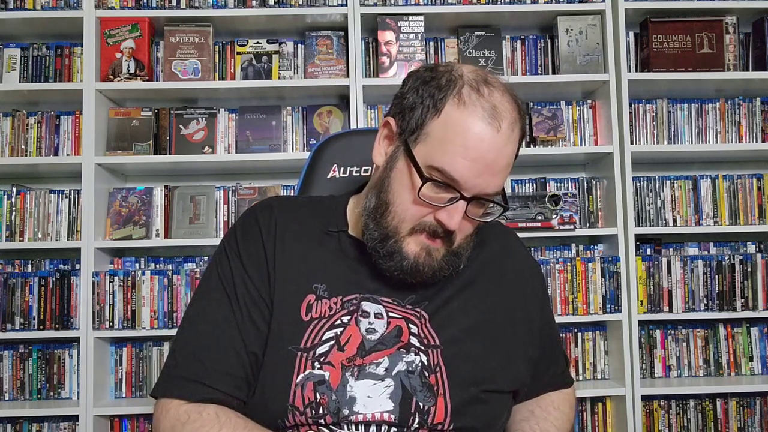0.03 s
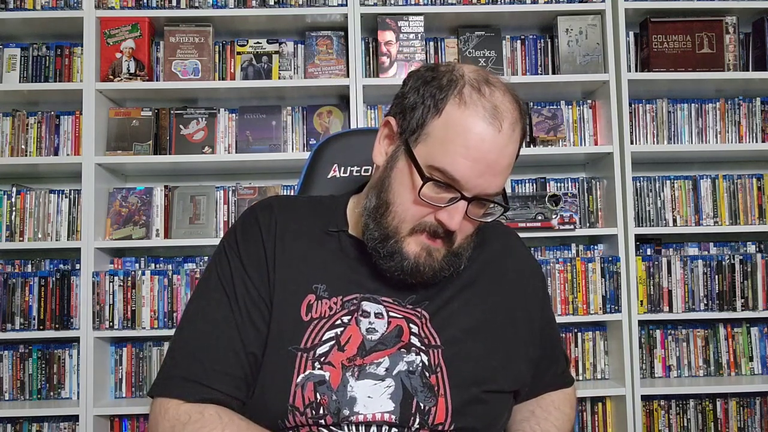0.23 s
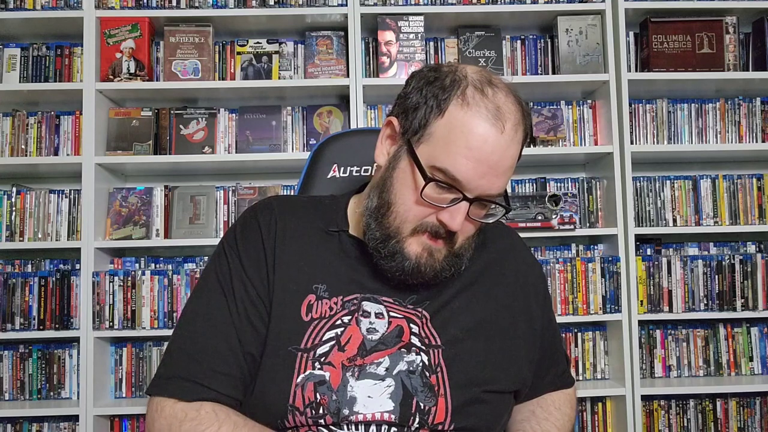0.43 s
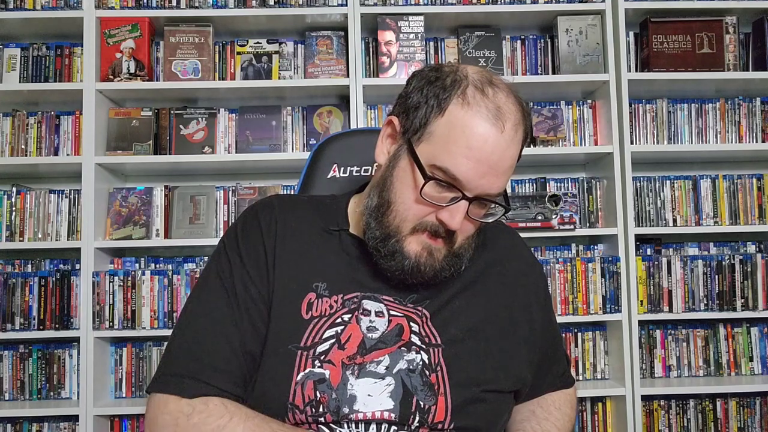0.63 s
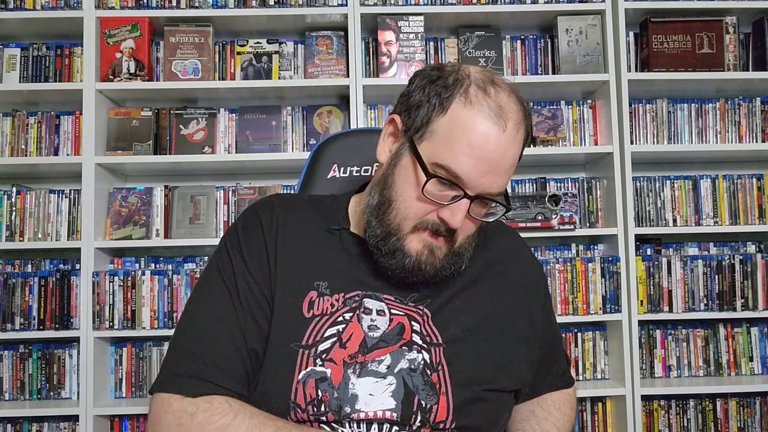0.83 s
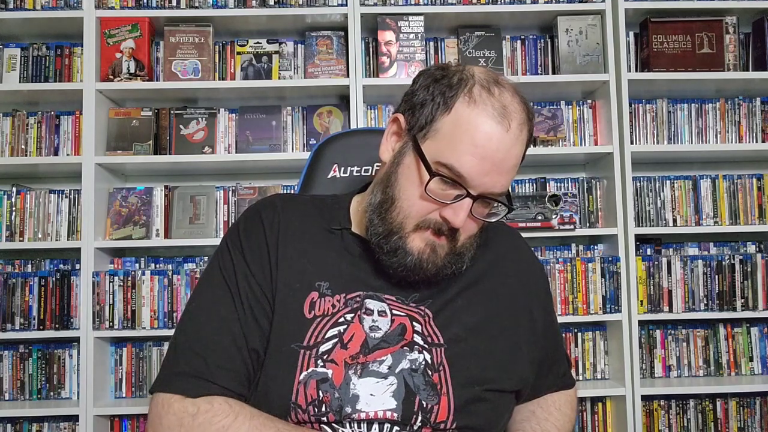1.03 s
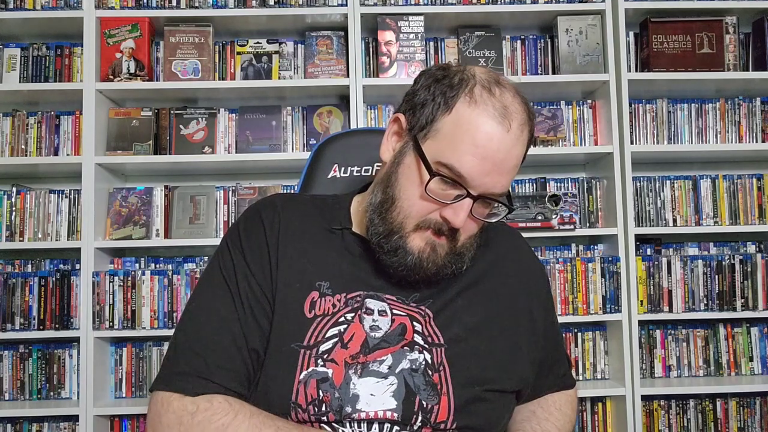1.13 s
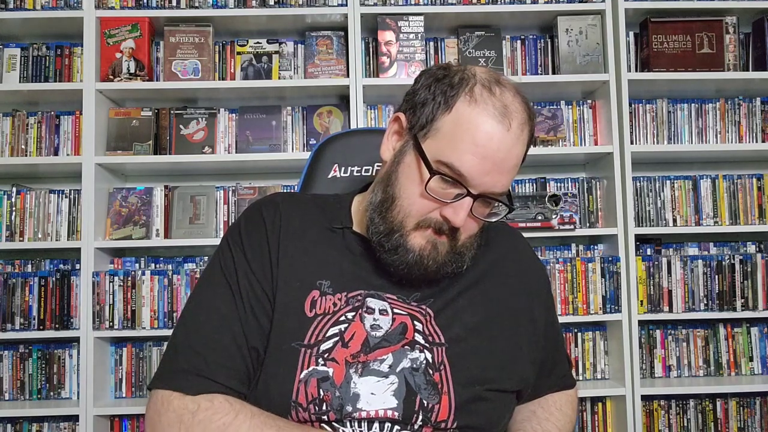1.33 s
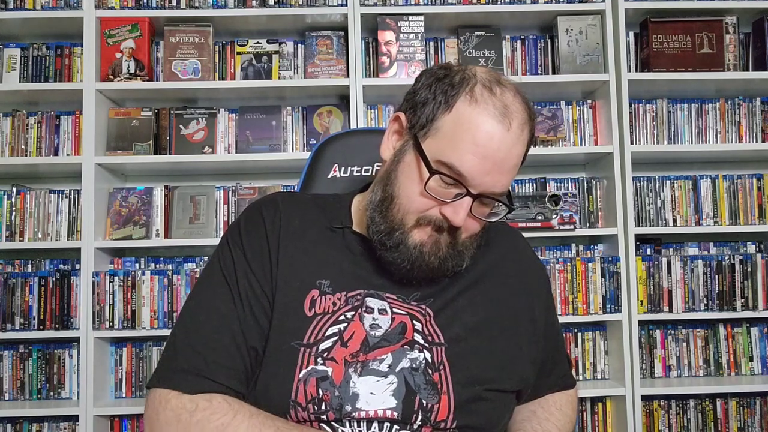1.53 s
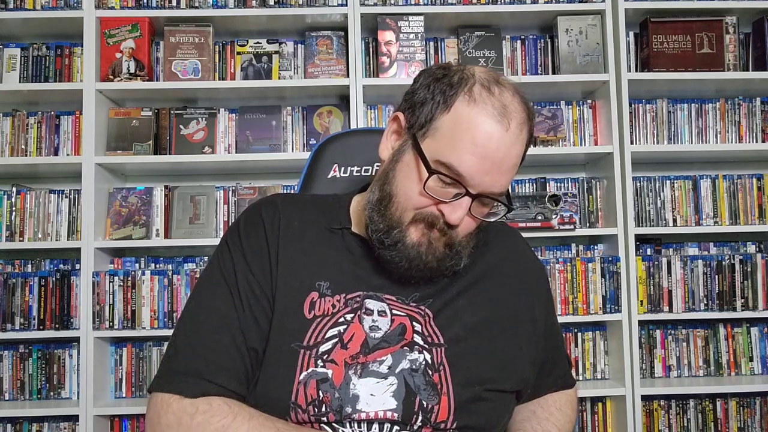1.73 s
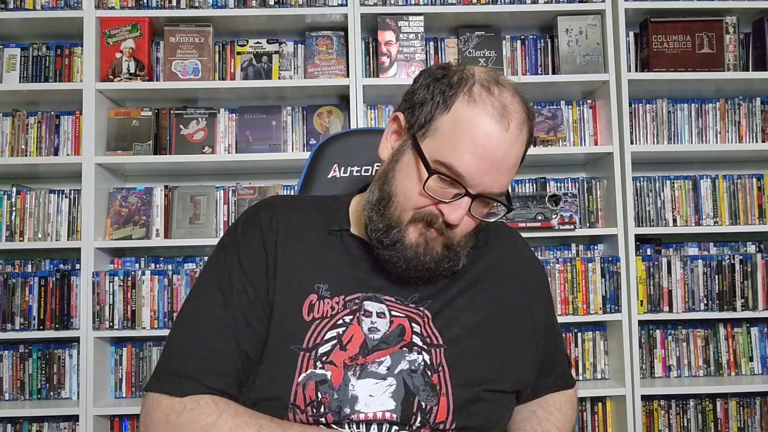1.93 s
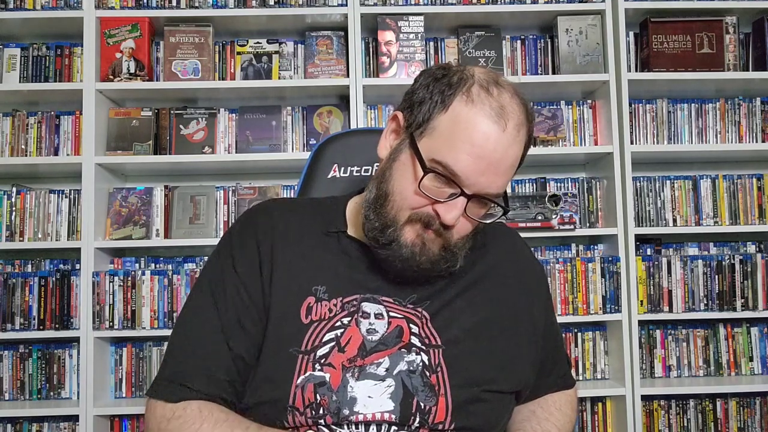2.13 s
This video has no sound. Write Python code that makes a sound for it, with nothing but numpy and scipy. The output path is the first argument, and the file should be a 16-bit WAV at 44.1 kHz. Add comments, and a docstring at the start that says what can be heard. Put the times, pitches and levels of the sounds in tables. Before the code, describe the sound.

A plastic disc case snaps open sharply, then light knocks and ticks in a quiet room

```python
"""Opening a plastic disc case

In a small quiet room a catch clicks, the case's shell snaps open and rebounds, then lid and fingers knock, tick
and rub over a desk. Contacts are decaying noise with damped modes; rubs are grainy noise; a convolved room answers.
Arms rustle from 1.1 s on, over a low hum of sine lines and faint air noise. Sound reaches the left channel first.
"""
import sys
import numpy as np
from scipy import signal
from scipy.fft import rfft, irfft, next_fast_len
from scipy.io import wavfile
from scipy.ndimage import map_coordinates

SR = 44100
rng = np.random.default_rng(int(sys.argv[2]) if len(sys.argv) > 2 else 0)


def dump_mix(stems):
    """Bounce the given channels to the path in sys.argv[1] as a 16-bit WAV at rate SR."""
    frames = np.atleast_2d(stems).T  # one column per channel
    limited = np.clip(frames, -1, 1)  # hard clip at full scale
    pcm = np.round(limited * 32767).astype(np.int16)
    wavfile.write(sys.argv[1], SR, pcm)


N = 97020  # length in samples

# All levels are those before the left-right balance.
# Lines of the hum. Each row: frequency in Hz, mean level in dB rms.
HUM_LINES = [(58.8, -64.5), (87, -62), (118.4, -82.5)]
# Colour of the room's faint noise. Each row: frequency in Hz, relative density in dB per Hz.
AIR_COLOUR = [(20, -19), (40, -15), (60, -7), (90, -8), (150, -24), (500, -27), (1500, -30), (2500, -37),
              (4000, -36), (6000, -42), (7600, -42), (9500, -52), (15500, -51)]
# Likeness of that noise in the two channels. Each row: frequency in Hz, correlation from 0 to 1.
AIR_ALIKE = [(60, 1.0), (500, 0.27), (3000, .5), (10000, 0.11)]
AIR_DB = -68  # rms

# Arms shifting on the desk. Each row: time in seconds, level in dB.
SHIFTING_LEVEL = [(1.1, -91), (1.288, -78), (1.368, -72.5), (2.14, -76), (2.2, -72)]
# Colour of that rustle. Each row: frequency in Hz, relative density in dB per Hz.
SHIFTING_COLOUR = [(100, -15), (230, 0), (500, -2), (1000, -7), (2000, -11), (4000, -24), (9000, -40)]

# Decay of the room's tail. Each row: frequency in Hz, t60 in seconds.
ROOM_DECAY = [(100, 0.44), (500, 0.29), (1500, 0.21), (4000, 0.35), (8000, 0.21), (15000, .26)]
# Likeness of the room's answer in the two channels. Each row: frequency in Hz, correlation from 0 to 1.
ROOM_LIKENESS = [(100, 0.7), (1000, 1), (4000, 0.17), (15000, 0.25)]
# levels of the tail and of the first answers of desk and shelves, and the decay of the latter
TAIL_DB, EARLY_DB, EARLY_T60_S = -13, -10, .1
ROOM_DELAY_S = .006  # before the whole answer

# Small contacts of lid, fingers and desk. Each row: start in seconds, level in dB, bass in dB, treble in dB,
# t60 of the noise in seconds, ring frequency in Hz, ring level in dB.
KNOCK_EVENTS = [(.3675, -45, 6, -20, .014, 1050, -8), (.377, -46, 4, -8, .015, 350, -10),
                (.3925, -36, -2, 1, .018, 400, -18), (.399, -41, 2, 0, .03, 1000, -14),
                (.405, -41, 2, -1, .025, 650, -11), (.4425, -43, 3, -22, .03, 1050, -8),
                (.4485, -43, 1, -24, .025, 690, 0), (.4745, -53, -3, -7, .04, 1700, -10),
                (.635, -59, -8, -1, .02, 1130, -6), (.718, -64, -3, -12, .04, 1700, -12),
                (.781, -47, 2, -4, .02, 1010, -8), (.7895, -54, 4, -6, .03, 420, -6),
                (.802, -57, 4, -5, .03, 430, -6), (.9025, -64, 2, -16, .03, 545, 9),
                (1.0838, -37, -4, 0, .018, 1720, -14), (1.0975, -39, 1, -3, .025, 950, -12),
                (1.103, -36, 0, 0, .016, 250, -13), (1.111, -43, 2, -9, .02, 545, -9),
                (1.227, -60, -1, -8, .035, 2150, -12), (1.278, -61, -1, -5, .035, 2150, -12),
                (1.41, -54, -8, -7, .035, 1060, -5), (1.464, -53, 0, -4, .025, 640, -7),
                (1.49, -58, -1, -5, .035, 1600, -8), (1.527, -52, -6, 0, .025, 2150, -9),
                (1.557, -52, -4, 1, .02, 3290, -7), (1.903, -58, 1, -10, .04, 900, -10),
                (1.915, -59, 1, -9, .03, 450, -12), (1.986, -58, 2, -15, .035, 1850, -11),
                (2.12, -59, -2, -14, .025, 2000, -7)]
# Plastic rubbing under the fingers. Each row: start in seconds, length in seconds, level in dB,
# bass in dB, treble in dB.
RUB_EVENTS = [(.204, 0.044, -36.5, -6, -9), (0.353, 0.039, -59.5, 12.5, -37.5),
              (0.371, 0.068, -48.5, 6.5, -6), (0.427, 0.076, -52.5, -0.5, -53),
              (1.088, 0.037, -42, -1, -26), (1.158, 0.063, -95.5, -8, 20.5), (1.398, 0.039, -68.5, 0, 0),
              (2.128, 0.055, -68.5, -1.5, -12.5)]
# Colour of a light contact. Each row: frequency in Hz, gain in dB.
CONTACT_COLOUR = [(60, -17.5), (150, 0), (260, 8), (500, 14.5), (750, 8), (1020, 14), (1300, 9),
                  (1700, 14.5), (2600, 7), (3300, 10.5), (5500, 10), (7500, 9), (9500, -1.5), (12000, 1.5),
                  (16000, -11)]
# Likeness of contact noise in the two channels. Each row: frequency in Hz, correlation from 0 to 1.
CONTACT_LIKENESS = [(100, 0.66), (1000, .93), (4000, .7), (15000, 0.26)]
RUB_GRAINS_PER_S = 1200  # mean rate
KNOCK_RING_T60_S = .065
ATTACK_S = .0005  # time constant of a contact's build-up
BASS_HZ, TREBLE_HZ = 537, 3000  # centre of the per-event body, corner of its treble

# Modes of the catch. Each row: frequency in Hz, level in dB, t60 in seconds.
CATCH_MODES = [(1420, -12, .015), (4930, -2, .007), (7000, -5, .005), (11000, -5, .004), (13700, -12, .004),
               (14800, -8, .004)]
CATCH_S, CATCH_DB = 0.073, -21  # start and level of the catch letting go
# The shell snapping open and rebounding. Each row: start in seconds, level in dB, bass in dB, treble in dB.
SNAP_EVENTS = [(.2010, -6, -9.5, 1), (0.2105, -26, 5, -16.5), (0.222, -17.5, -8.5, 3),
               (0.2291, -15.5, -6, 0), (.2368, -24.5, -2, -16)]
# Modes of the shell. Each row: frequency in Hz, level in dB, t60 in seconds.
SHELL_MODES = [(553, -16.5, 0.15), (664, -11.5, 0.059), (780, -12.5, 0.033), (1390, -22.5, 0.012),
               (2185, -23, .04), (2573, -18, 0.043), (3231, -6, .03), (4316, -1, .015), (5713, -0.5, .008),
               (5250, -9, 0.0051), (6360, -6, .009), (11100, -12.5, 0.0046), (11990, -8, 0.008)]
# Colour of the crack of a snap. Each row: frequency in Hz, gain in dB.
CRACK_COLOUR = [(60, -26.5), (150, -18), (300, -8.5), (550, 2), (1000, -1), (2200, -3.5), (4000, 6),
                (6200, 3), (8000, -3.5), (12000, -8), (15500, -9)]
MODE_SEND_DB, CRACK_SEND_DB = -6, 0  # how strongly the modes and the crack radiate into the room
SHELL_LOW_HZ = 330  # the small shell radiates little below this

# Balance of the channels. Each row: frequency in Hz, left minus right in dB.
LEFT_MINUS_RIGHT = [(100, 2), (1000, 1.6), (2700, 2.5), (3700, 3), (4600, 3.5), (6700, 6.5), (8800, 3),
                    (11700, -8), (14000, 1)]
LEFT_LEAD_S = 8.2e-5
TOP_HZ = 15950  # upper band limit


def amp(db):
    """Decibels are a logarithm of amplitude: 20 dB is a factor of ten."""
    return 10 ** (np.asarray(db) / 20)


def unit(x):
    """Normalization divides a signal by its rms value."""
    return x / np.sqrt(np.mean(x ** 2) + 1e-20)


def along(points, hz):
    """Interpolation of (Hz, value) points is linear in the logarithm of frequency."""
    f, v = np.transpose(points)
    return np.interp(np.log(hz + 1), np.log(f + 1), v)


def wobble(rate):
    """A spline through random knots, rate of them a second, is a smooth slow fluctuation."""
    knots = rng.standard_normal(int(N * rate / SR) + 4)
    return map_coordinates(knots, [np.arange(N) * rate / SR])


def filtered(x, response):
    """Linear filtering is multiplication of the spectrum by a frequency response."""
    n = x.shape[-1]
    m = next_fast_len(n + SR // 10)
    return irfft(rfft(x, m) * response(np.fft.rfftfreq(m, 1 / SR)), m)[..., :n]


def coloured(x, gain_db, size=16384):
    """Folding the cepstrum of a gain curve gives its minimum-phase filter, which is causal."""
    gain = amp(gain_db(np.fft.rfftfreq(size, 1 / SR)))
    cepstrum = irfft(np.log(gain + 1e-6))
    cepstrum[1:size // 2] *= 2
    cepstrum[size // 2 + 1:] = 0
    response = np.exp(rfft(cepstrum))
    return irfft(response * rfft(x, size))[..., :size // 2]


def spread(pair, alike):
    """Mid and side shares of two unrelated signals set the correlation of left and right."""
    def shares(hz):
        turn = np.arccos(np.clip(along(alike, hz), -1, 1)) / 2
        return np.array([np.cos(turn), np.sin(turn)])

    mid, side = filtered(pair, shares)
    return np.array([mid + side, mid - side])


def add(out, s, x):
    """Sounds superpose: x is summed into out from time s, in seconds."""
    part = out[:, round(s * SR):][:, :x.shape[1]]
    part += x[:, :part.shape[1]]


def background():
    """A hum is a sum of sines, here unsteady in level and phase, over coloured stationary noise."""
    t = np.arange(N) / SR
    hum = 0
    for hz, db in HUM_LINES:
        level = amp(db + 0.54 * wobble(4)) * np.sqrt(2)  # rms to peak
        phase = 2 * np.pi * (hz * t + rng.random()) + .1 * wobble(3.3)
        hum = hum + level * np.sin(phase)
    air = filtered(rng.standard_normal((2, N)), lambda hz: amp(along(AIR_COLOUR, hz)))
    return hum + amp(AIR_DB) * unit(spread(air, AIR_ALIKE))


def room(x):
    """Reverberation is convolution with decaying noise: early answers of desk and shelves, and a tail."""
    hz, t, z = signal.stft(rng.standard_normal((2, SR // 2)), SR, nperseg=256)
    decay = amp(-60 * t / along(ROOM_DECAY, hz)[:, None])
    tail = signal.istft(z * decay, SR, nperseg=256)[1]
    early_t = np.arange(tail.shape[1]) / SR
    early = rng.standard_normal(tail.shape) * amp(-60 * early_t / EARLY_T60_S)
    answer = amp(TAIL_DB) * tail / np.linalg.norm(tail[0])
    answer = answer + amp(EARLY_DB) * early / np.linalg.norm(early[0])
    delay = round(ROOM_DELAY_S * SR) + 1
    answer = np.pad(spread(answer, ROOM_LIKENESS), ((0, 0), (delay, 0)))
    return signal.fftconvolve(x[None], answer, axes=1)


def shifting():
    """Friction of arms and cloth is broadband noise, dull in colour and uneven in level."""
    s, db = np.transpose(SHIFTING_LEVEL)
    level_db = np.interp(np.arange(N) / SR, s, db, left=-120)
    level = amp(level_db + 3.0 * wobble(23.92))
    noise = rng.standard_normal(N)
    rustle = level * unit(filtered(noise, lambda hz: amp(along(SHIFTING_COLOUR, hz))))
    return rustle + room(rustle)[:, :N]


def shelves(hz, bass_db, treble_db):
    """Body and hardness of a contact are a bell around BASS_HZ and a shelf above TREBLE_HZ, in dB."""
    bell = np.exp(-np.log2((hz + 1) / BASS_HZ) ** 2)
    shelf = 1 - 1 / (1 + (hz / TREBLE_HZ) ** 4)
    return bass_db * bell + treble_db * shelf


def burst(spectrum, t60):
    """Dense plastic vibration acts as stereo noise that builds quickly and decays exponentially."""
    t = np.arange(SR // 8) / SR
    noise = spread(rng.standard_normal((2, len(t))), CONTACT_LIKENESS)
    envelope = amp(-60 * t / t60) * (1 - np.exp(-t / ATTACK_S))
    return coloured(noise * envelope, lambda hz: along(spectrum, hz))


def ringing(modes, size):
    """A struck body rings as a sum of exponentially damped modes, all started together."""
    t = np.arange(size) / SR
    ring = 0
    for hz, db, t60 in modes:
        ring = ring + amp(db - 60 * t / t60) * np.sin(2 * np.pi * (hz * t + rng.random()))
    return (1 - np.exp(-t / ATTACK_S)) * ring


def rubs():
    """Sliding friction is a train of random slips over weak noise, swelling and fading with the stroke."""
    out = np.zeros((2, N))
    t = np.arange(SR // 8) / SR
    for s, length, db, bass_db, treble_db in RUB_EVENTS:
        noise = rng.standard_normal(len(t))
        grains = rng.random(len(t)) < RUB_GRAINS_PER_S / SR
        slips = noise * (0.16 + grains)
        stroke = unit(slips) * np.sin(np.pi * np.minimum(t / length, 1))
        rub = coloured(stroke, lambda hz: along(CONTACT_COLOUR, hz) + shelves(hz, bass_db, treble_db))
        rub = amp(db) * rub
        add(out, s, rub[None])
        add(out, s, room(rub))
    return out


def knocks():
    """A light impact is a noise burst that wakes one mode of the hand-damped case."""
    out = np.zeros((2, N))
    for s, db, bass_db, treble_db, t60, ring_hz, ring_db in KNOCK_EVENTS:
        contact = coloured(burst(CONTACT_COLOUR, t60), lambda hz: shelves(hz, bass_db, treble_db))
        ring = ringing([(ring_hz, ring_db, KNOCK_RING_T60_S)], contact.shape[1])
        knock = amp(db) * (contact + ring)
        add(out, s, knock)
        add(out, s, room(knock[0]))
    return out


def radiation(hz):
    """A small plate radiates weakly at low frequency; this is its bass loss in dB."""
    return -10 * np.log10(1 + (SHELL_LOW_HZ / (hz + 20)) ** 4)


def snap(modes, crack_db, crack_t60):
    """Sudden release gives a noisy crack and leaves modes ringing; the room answers both."""
    crack = amp(crack_db) * burst(CRACK_COLOUR, crack_t60)
    ring = ringing(modes, crack.shape[1])
    out = room(amp(CRACK_SEND_DB) * crack[0] + amp(MODE_SEND_DB) * ring)
    add(out, 0, crack + ring)
    return out


def opening():
    """Stored elastic energy is released: the catch clicks, then the shell springs open and rattles back."""
    out = np.zeros((2, N))
    add(out, CATCH_S, amp(CATCH_DB) * snap(CATCH_MODES, crack_db=-1.5, crack_t60=0.024))
    for s, db, bass_db, treble_db in SNAP_EVENTS:
        x = snap(SHELL_MODES, crack_db=-3, crack_t60=0.018)
        x = coloured(x, lambda hz: shelves(hz, bass_db, treble_db) + radiation(hz), size=65536)
        add(out, s, amp(db) * x)
    return out


def scene():
    """Superposed sources gain direction from level and time differences between the channels."""
    dry = opening() + knocks() + rubs() + shifting() + background()
    sides = np.array([[.5], [-.5]])  # half of each difference to left and right

    def direction(hz):
        level = amp(sides * along(LEFT_MINUS_RIGHT, hz))
        return level * np.exp(2j * np.pi * hz * sides * LEFT_LEAD_S)

    return filtered(dry, direction)


def record(dry):
    """Band limitation: a very steep low-pass leaves almost nothing above TOP_HZ."""
    return filtered(dry, lambda hz: 1 / np.sqrt(1 + (hz / TOP_HZ) ** 160))


dry = scene()
out = record(dry)
dump_mix(out)
```